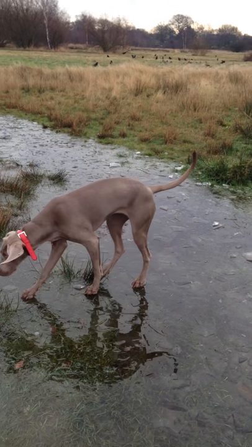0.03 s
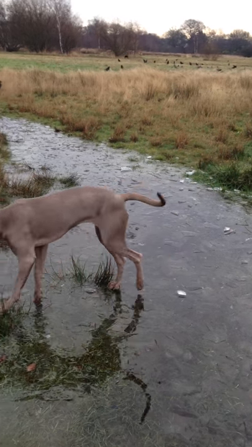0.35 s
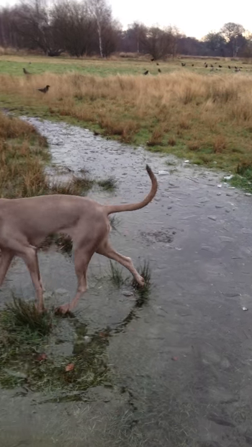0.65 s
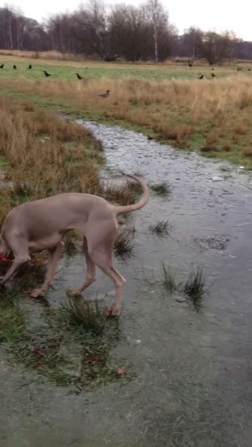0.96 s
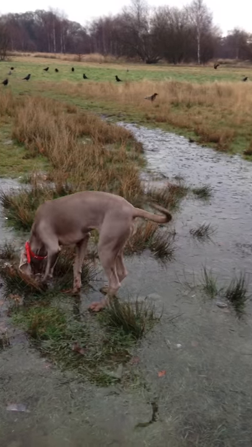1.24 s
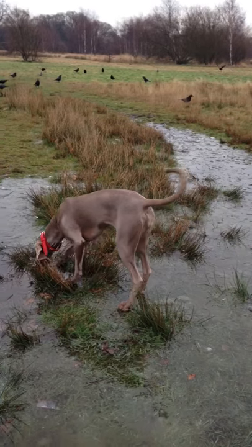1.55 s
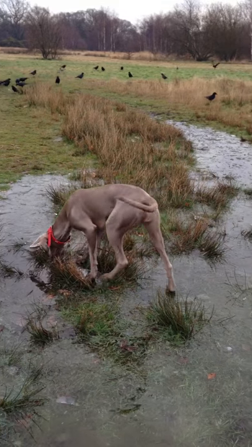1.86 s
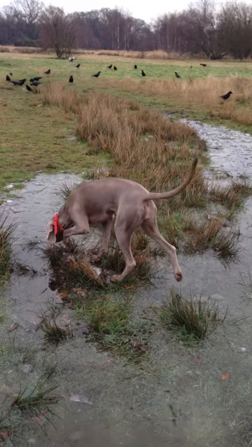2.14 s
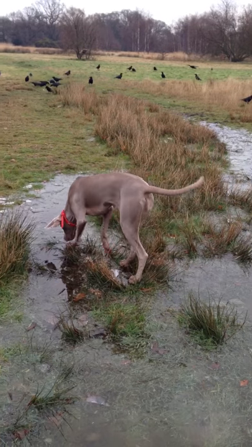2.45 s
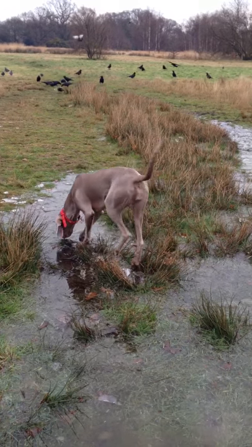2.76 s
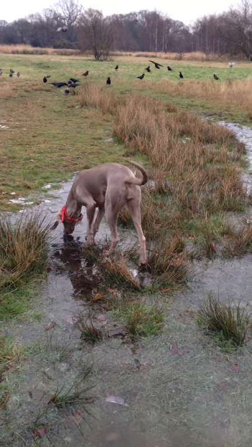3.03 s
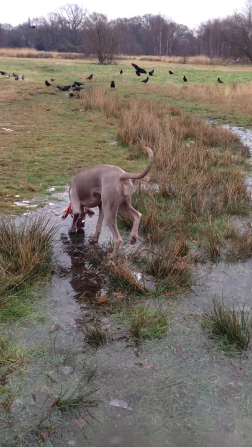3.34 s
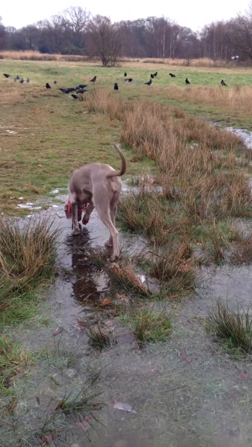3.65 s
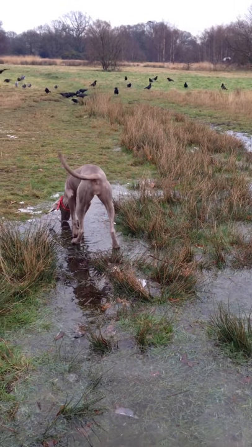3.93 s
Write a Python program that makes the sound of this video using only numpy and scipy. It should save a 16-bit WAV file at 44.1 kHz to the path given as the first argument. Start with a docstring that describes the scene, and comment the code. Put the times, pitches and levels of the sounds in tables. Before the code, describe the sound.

A dog's claws tick and crunch lightly on thin ice, busiest in the first second, then sparse until the end. Wind rumbles and bumps on the microphone, with a stronger gust from about 0.7 to 1 second. A soft swish of grass comes around 2.3 seconds. A far road roars faintly throughout, and a distant vehicle swells from about 3.3 seconds.

```python
"""Wind bumps and rumbles on the microphone in an open field, over the roar and faint drone of a far road.
A dog walks across a thinly frozen puddle: its claws tick on the ice, which cracks and crunches under
the paws, each fracture a brief burst coloured by a resonance of the sheet. The steps thin out as the
dog slows and noses about in the grass at the edge. Near the end a distant vehicle draws closer."""
import sys
import numpy as np
from scipy import signal
from scipy.fft import rfft, irfft
from scipy.io import wavfile

SR = 44100
rng = np.random.default_rng(int(sys.argv[2]) if len(sys.argv) > 2 else 0)


def put_to_file(sound):
    """Save the sound as 16-bit audio at rate SR, in the file named by the first command-line argument."""
    columns = np.atleast_2d(sound).T  # one column per channel
    safe = np.clip(columns, -1, 1)
    whole_steps = np.round(safe * 32767)
    wavfile.write(sys.argv[1], SR, whole_steps.astype(np.int16))


N = 176400
T = np.arange(N) / SR

# Spectrum of snapping ice. Each row: frequency in Hz, gain in dB.
SNAP_SPECTRUM = [(300, -1), (1200, 6), (2300, 5), (4000, 3), (6500, 1), (8500, -1.5), (11000, -4),
                 (13200, -3.5), (16000, -10)]


def amp(db):
    """Decibels to amplitude ratio."""
    return 10 ** (np.asarray(db) / 20)


def unit(x):
    """Normalisation to rms 1."""
    return x / np.sqrt(np.mean(x ** 2) + 1e-20)


def level(points):
    """Amplitude envelope through points. Each row: time in seconds, level in dB."""
    return amp(np.interp(T, *np.transpose(points)))


def add(mix, start_s, sound):
    """Superposition: a sound joins the mix at its start time."""
    at = round(start_s * SR)
    part = mix[max(at, 0):][:len(sound)]
    part += sound[:len(part)]


def colour(x, points):
    """Zero-phase filtering through points. Each row: frequency in Hz, gain in dB."""
    hz, db = np.transpose(points)
    f = np.fft.rfftfreq(len(x), 1 / SR)
    gain = amp(np.interp(np.log(f + 1), np.log(hz), db))
    return irfft(rfft(x) * gain, len(x))


def noise(spectrum):
    """Spectrally shaped Gaussian noise of rms 1."""
    return unit(colour(rng.standard_normal(N), spectrum))


def drift(rate_hz):
    """Low-passed noise of rms 1, for random modulation."""
    f = np.fft.rfftfreq(N, 1 / SR)
    return unit(irfft(rfft(rng.standard_normal(N)) * np.exp(-(f / rate_hz) ** 2), N))


def grains(per_s, spread_db):
    """A Poisson process of tiny impulses, a few of them large."""
    impulses = rng.standard_normal(N) * (rng.random(N) < per_s / SR)
    return impulses * amp(spread_db * np.minimum(rng.exponential(1, N), 4))


def resonance(x, hz, height_db, width_oct, tilt_db):
    """The spectral peak of a damped resonance; the treble above it slopes by tilt_db per octave."""
    f = np.geomspace(100, SR / 2, num=300)
    octaves = np.log2(f / hz)
    peak_db = height_db / (1 + (octaves / width_oct) ** 2)
    return colour(x, np.c_[f, peak_db + tilt_db * np.maximum(octaves, 0)])


def wind(lumpy_db=2.2):
    """Turbulent pressure on the microphone makes a lumpy rumble, with one stronger gust."""
    # Spectra. Each row: frequency in Hz, relative density in dB.
    breeze_spectrum = [(20, -48), (35, -8), (55, 1.5), (80, -1), (150, -4), (210, -11), (300, -14.5),
                       (400, -26), (600, -27.5), (1200, -66)]
    gust_spectrum = [(30, -10), (70, -1.5), (120, 1.5), (220, -2.5), (330, -17.5), (450, -24), (700, -68),
                     (2000, -55)]
    # Envelopes. Each row: time in seconds, level in dB.
    breeze_level = [(0, -46), (.15, -49.5), (.36, -46), (.43, -45), (.56, -45), (.63, -37), (.71, -42),
                    (1.0, -47), (1.15, -55.5), (1.27, -46), (1.55, -48), (1.75, -42.5), (2.05, -44),
                    (2.35, -46), (2.7, -48.5), (2.83, -43.5), (2.95, -49), (3.3, -49), (3.45, -47.5),
                    (3.95, -48.5)]
    gust_level = [(.68, -61), (.735, -37.5), (.80, -31.5), (.83, -44), (.89, -36), (.96, -39.5),
                  (1.02, -90)]
    breeze = unit(noise(breeze_spectrum) * amp(lumpy_db * drift(rate_hz=26)))
    return level(breeze_level) * breeze + level(gust_level) * noise(gust_spectrum)


def road(patchy_db=1.01, waver=0.0068, flutter_db=3):
    """Far tyres radiate broadband noise and engines wavering tones; one vehicle swells as it nears."""
    # Spectra of the road and of the vehicle, with its engine hum and singing tyres.
    # Each row: frequency in Hz, relative density in dB.
    road_spectrum = [(40, -7), (200, -11), (400, -4.5), (580, -5.5), (800, 0), (1050, 1.5), (1600, -1),
                     (2000, -8), (2600, -18), (3500, -34.5), (6000, -33)]
    vehicle_spectrum = [(100, -18), (135, -20), (165, 11), (205, -17.5), (300, -25), (700, -10), (950, -6),
                        (1140, 1.5), (1330, -3.5), (1550, -5.5), (1900, -12), (3000, -37.5)]
    # Envelopes. Each row: time in seconds, level in dB.
    road_level = [(0, -49), (.7, -49.5), (1.3, -49), (2.0, -49.5), (2.7, -49.5), (3.3, -50.5), (4, -56)]
    vehicle_level = [(2.6, -86), (3.15, -63), (3.55, -49), (3.72, -49.5), (3.88, -44.5), (4, -57.5)]
    # Engine tones. Each row: start and end in seconds, frequency in Hz, rms level at full swell in dB.
    drones = [(.32, 0.5, 425, -58), (1.1, 1.47, 436, -60), (1.45, 2.3, 440, -64.5), (1.15, 1.7, 324, -66),
              (1.68, 2.1, 323, -57), (2.1, 2.85, 316, -62), (1.744, 2.45, 243.8, -59.5)]
    roar = level(road_level) * noise(road_spectrum)
    vehicle = level(vehicle_level) * noise(vehicle_spectrum)
    out = (roar + vehicle) * amp(patchy_db * drift(rate_hz=35))
    for start, end, hz, db in drones:
        progress = np.clip((T - start) / (end - start), 0, 1)
        swell = np.sqrt(abs(np.sin(np.pi * progress)))
        pitch_hz = hz * (1 + waver * drift(rate_hz=11.6))
        tone = np.sin(2 * np.pi * np.cumsum(pitch_hz) / SR)
        out += amp(db) * swell * unit(tone * amp(flutter_db * drift(rate_hz=15)))
    return out


def hiss():
    """A faint, steady floor of broadband noise."""
    # Each row: frequency in Hz, relative density in dB.
    spectrum = [(500, 4), (2500, 2.5), (4500, 2.5), (7000, -5), (10000, -5), (16000, -3)]
    return amp(-66.5) * noise(spectrum)


def rustle(low_hz=2970, high_hz=13060, pitches=30, decay_s=0.0004):
    """A faint, fine, high rustle around the dog, a superposition of dense, tiny grains."""
    # Each row: time in seconds, level in dB.
    envelope = [(0, -67), (.23, -68), (.4, -64.5), (.6, -65), (.75, -59), (.93, -70), (1.12, -66.5),
                (1.65, -73.5), (2.05, -70), (2.35, -82), (2.65, -80), (3.95, -93)]
    out, t = np.zeros(N), np.arange(600) / SR
    for hz in np.linspace(low_hz, high_hz, pitches):
        grain = np.sin(2 * np.pi * hz * t) * np.exp(-t / decay_s)
        out += signal.oaconvolve(grains(per_s=7000 / pitches, spread_db=1.9), grain)[:N]
    return level(envelope) * unit(colour(out, SNAP_SPECTRUM))


def wind_bumps(narrowing=4.98, spread=6.3):
    """Pressure pulses on the microphone: each push or pull is balanced by a wider, opposite swing."""
    # Each row: time in seconds, peak in dB, sharpness of the thump in Hz (higher is shorter and
    # brighter), 1 for a push or -1 for a pull.
    bumps = [(.0025, -22, 111, 1), (.0075, -19.5, 210, -1), (0.023, -27, 189, 1), (0.0507, -21.5, 123, 1),
             (0.060, -24, 113, 1), (0.2424, -19.5, 204, -1), (0.2571, -22.5, 193, -1),
             (0.454, -21.5, 125, 1), (.6520, -21.5, 262, 1), (0.6583, -19.5, 114, -1), (.661, -22, 180, 1),
             (0.6689, -20.5, 245, 1), (.752, -29, 150, 1), (0.772, -28, 120, -1), (0.7819, -25.5, 257, -1),
             (0.7871, -17.5, 208, 1), (0.7915, -23, 170, -1), (0.8128, -21, 170, 1),
             (0.8428, -23.5, 150, -1), (0.8949, -21.5, 150, 1), (0.9364, -13.5, 227, 1),
             (0.9436, -13.5, 213, 1), (1.44, -30, 92.5, 1), (2.064, -30, 110, 1), (2.1280, -33.5, 116, 1),
             (2.235, -33, 116, -1), (2.851, -32.5, 116, -1)]
    out = np.zeros(N)
    for peak_s, db, sharpness_hz, direction in bumps:
        u = narrowing * sharpness_hz * (T - peak_s)
        pulse = np.exp(-u ** 2) - np.exp(-(u / spread) ** 2) / spread
        out += direction * amp(db) * pulse / (1 - 1 / spread)
    return out


def ice_ticks(attack_s=0.0005, flatness=0.8):
    """Impulsive excitation: a claw or a crack makes a broad burst, coloured by a resonance of the ice."""
    # Each row: start in seconds, level in dB, resonance in Hz, its height in dB,
    # decay time in seconds, treble slope in dB per octave.
    ticks = [(.0090, -52, 4500, 15, 0.00051, 0), (0.013, -56, 4030, 4, .0008, -2),
             (0.0966, -50, 4260, 18, .0014, 5), (0.1084, -48.5, 4000, 3, 0.0019, 3),
             (0.2755, -50, 3700, 8, 0.0024, -9), (0.2808, -47.5, 7600, 7, 0.0021, -15),
             (.2905, -55, 4500, 6, .001, -5), (.3120, -51, 5400, 8, .0007, -10),
             (.337, -53, 5000, 6, .0005, 0), (0.342, -49, 6000, -1, 0.00058, 2),
             (0.3458, -37, 5600, 26, 0.00049, -1), (0.3461, -43, 6600, 18, .0005, -5),
             (0.3833, -46.5, 12800, 12, 0.00069, 1), (.3934, -34.5, 5500, 16, 0.00087, -5),
             (0.393, -43, 2400, 31, .0012, -4), (0.404, -43.5, 4070, 3, 0.0029, -6),
             (0.4624, -40.5, 4300, 0, 0.00036, -18), (0.464, -50, 12800, 23, 0.0016, 2),
             (0.478, -46, 4000, 3, 0.00051, -6), (0.5090, -34, 6560, 14.5, 0.00068, -8),
             (0.509, -36, 3550, 10, 0.00066, -0.5), (0.5685, -50, 4500, 6, 0.00049, -6),
             (0.5928, -39, 5700, 8, 0.00057, -3), (0.679, -31.5, 2010, 3.5, .0005, -4),
             (0.6794, -33.5, 2400, 24, 0.0014, -2), (0.704, -40.5, 2480, 13, 0.0012, -3),
             (0.7912, -46, 3600, 3, .0008, -10), (0.8347, -37, 3280, 5, 0.00053, -2.5),
             (0.8558, -45.5, 4900, 10, 0.0017, 1), (.8715, -58, 4500, 5, .0008, 2),
             (0.9665, -55.5, 4500, 5, .0015, 3), (1.064, -58, 4500, 11, 0.0013, -2),
             (1.1403, -47.5, 3950, 6, 0.0018, -1), (1.333, -62, 4000, 10, .002, -3),
             (1.767, -50.5, 4000, 8, 0.0014, -3), (1.781, -56, 4000, 6, .002, 3),
             (2.441, -61, 3600, 7, .0015, -5), (2.9855, -51.5, 5260, 11, 0.0019, 4),
             (3.611, -49.5, 4000, 6, 0.0014, 1)]
    out, t = np.zeros(N), np.arange(4096) / SR
    lead = 512  # samples of room for the filters to spread ahead of the onset
    for start, db, hz, height_db, decay_s, tilt_db in ticks:
        envelope = np.exp(-t / decay_s) * (1 - np.exp(-t / attack_s))
        spectrum = rfft(np.roll(rng.standard_normal(len(t)) * envelope, lead))
        whitened = irfft(spectrum / abs(spectrum) ** flatness)
        snap = resonance(colour(whitened, SNAP_SPECTRUM), hz, height_db, width_oct=0.2, tilt_db=tilt_db)
        burst_rms = np.sqrt(np.sum(snap ** 2) / ((attack_s + decay_s) * SR))
        add(out, start - lead / SR, amp(db) * snap / burst_rms)
    return out


def scatter(x, t60_s=0.04, build_s=0.009, tail_db=-14):
    """Scattering by the ice sheet and the ground adds a short, faint tail."""
    t = np.arange(SR // 5) / SR
    tail = rng.standard_normal(len(t)) * amp(-60 * t / t60_s) * (1 - np.exp(-t / build_s))
    return x + amp(tail_db) * signal.fftconvolve(x, tail / np.linalg.norm(tail))[:N]


def paw_crunches(clump_db=2.5):
    """Brittle fracture: ice and frozen grass give way under a paw in quick clumps of tiny cracks."""
    # Each row: start and length in seconds, rms level in dB, centre in Hz, treble slope in dB per octave.
    crunches = [(0.09, 0.049, -64, 5030, 4), (0.649, 0.015, -57.5, 5000, -7), (0.717, 0.095, -56, 5800, -1),
                (1.038, 0.012, -53.5, 4600, 2.5), (1.099, 0.015, -63, 6000, 5),
                (1.2088, 0.015, -50.5, 7000, 0), (1.765, 0.007, -55.5, 4100, -5),
                (2.228, 0.011, -63, 4000, -5), (2.490, 0.015, -52.5, 7500, 7),
                (2.793, 0.0099, -63, 7000, 5), (3.609, 0.016, -55.5, 6000, -1),
                (3.784, 0.0049, -57, 5500, 1)]
    clumps = amp(clump_db * drift(rate_hz=90))
    fractures = colour(clumps * grains(per_s=2500, spread_db=3.2), SNAP_SPECTRUM)
    out = np.zeros(N)
    for start, length, db, hz, tilt_db in crunches:
        progress = np.arange(0, 1, 1 / (length * SR))
        envelope = np.sin(np.pi * progress ** 0.56)  # quick rise, slower fall
        run = fractures[round(start * SR):][:len(progress)]
        crunch = resonance(run, hz, height_db=4.5, width_oct=0.41, tilt_db=tilt_db)
        add(out, start, amp(db) * unit(crunch * envelope))
    return out


def grass_swish():
    """Friction: the dog brushes through wet grass, and dense, tiny impulses merge into a soft crackle."""
    # Each row: time in seconds, level in dB.
    envelope = [(2.1, -86), (2.22, -68), (2.34, -66), (2.45, -66.5), (2.55, -75)]
    # Each row: frequency in Hz, relative density in dB.
    spectrum = [(2000, -31), (3200, -1), (4400, -3.5), (5800, -5), (8000, -9), (14000, -14)]
    return level(envelope) * unit(colour(grains(per_s=1500, spread_db=2.5), spectrum))


def scene():
    """The dog, the wind, the road and the hiss superpose in one channel."""
    dog = scatter(ice_ticks() + paw_crunches()) + rustle() + grass_swish()
    return (dog + wind_bumps() + wind() + road() + hiss())[None]


def record(dry, low_cut_hz=31, band_edge_hz=15350):
    """Band limiting: the microphone's low cut, then a steep low-pass."""
    high_pass = signal.butter(2, low_cut_hz, "high", fs=SR, output="sos")
    low_pass = signal.firwin(611, band_edge_hz, window=("kaiser", 8), fs=SR)
    thinned = signal.sosfiltfilt(high_pass, dry, padtype="even")
    return signal.oaconvolve(thinned, low_pass[None], "same")


dry = scene()
out = record(dry)
put_to_file(out)
```